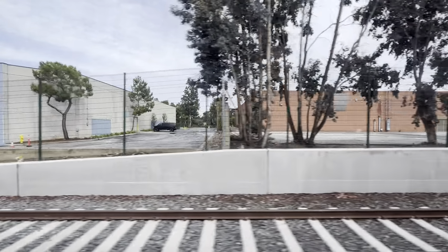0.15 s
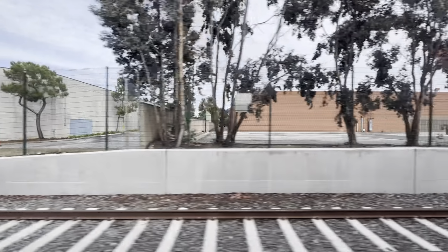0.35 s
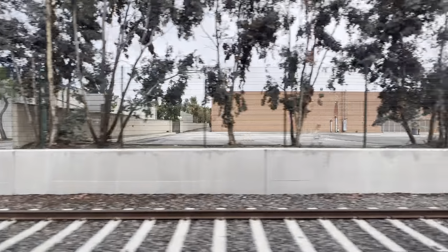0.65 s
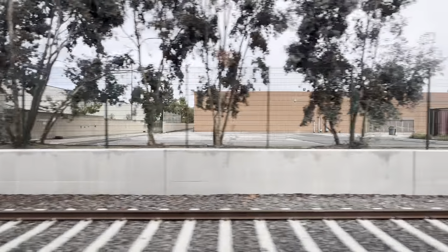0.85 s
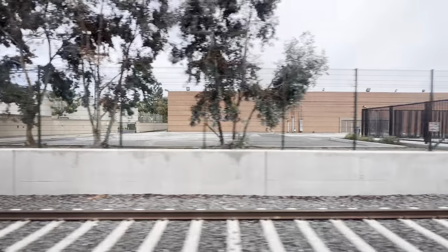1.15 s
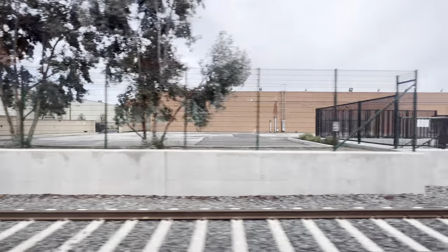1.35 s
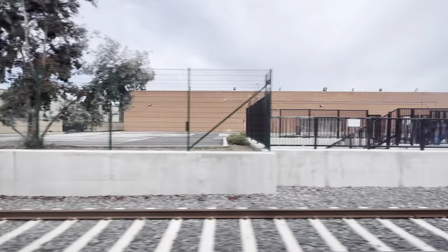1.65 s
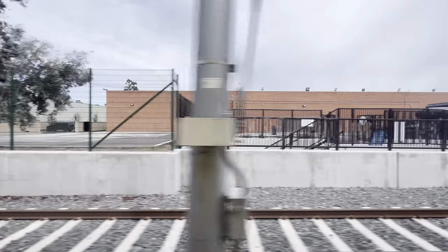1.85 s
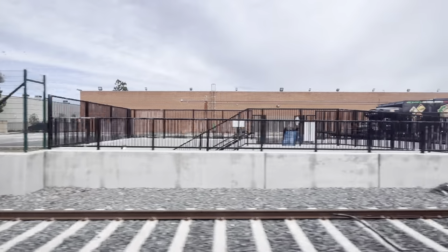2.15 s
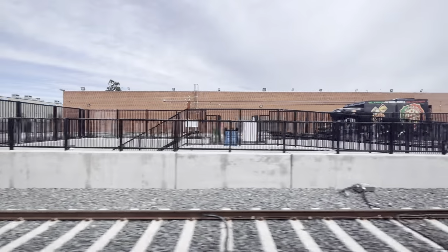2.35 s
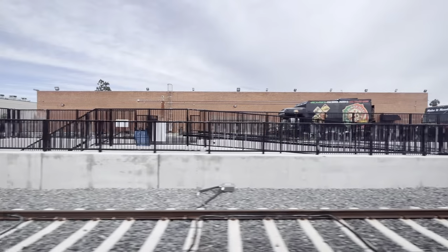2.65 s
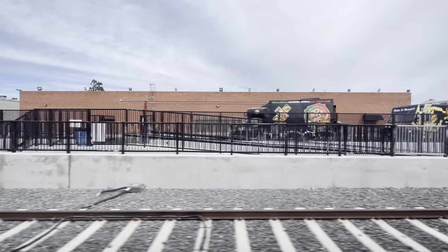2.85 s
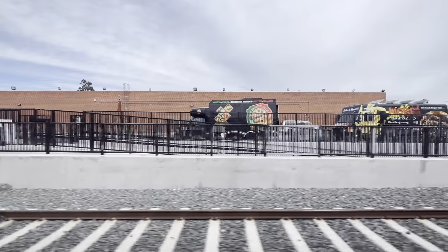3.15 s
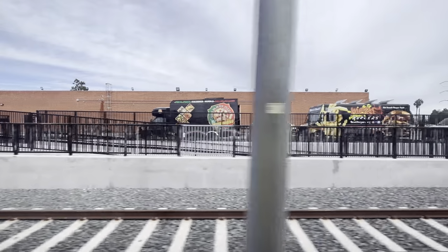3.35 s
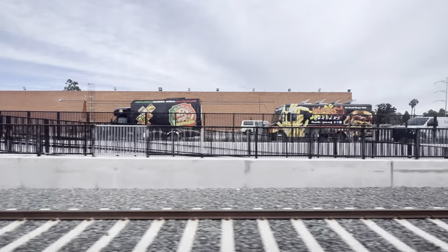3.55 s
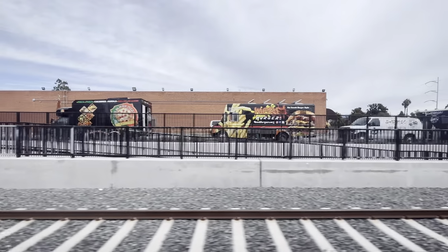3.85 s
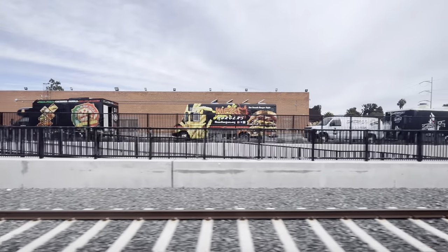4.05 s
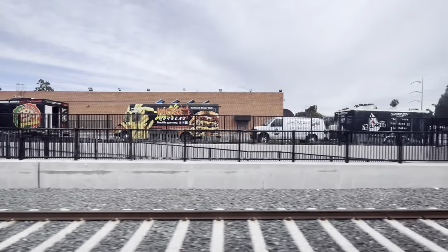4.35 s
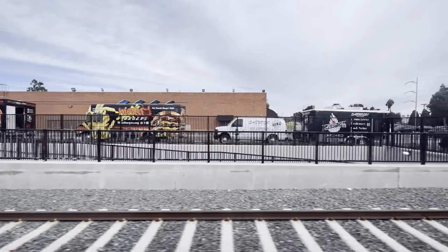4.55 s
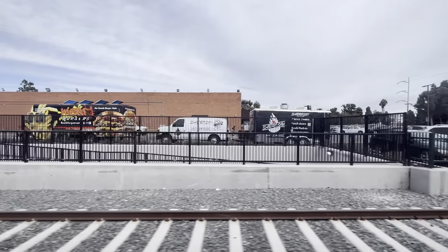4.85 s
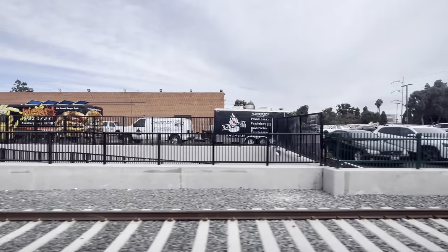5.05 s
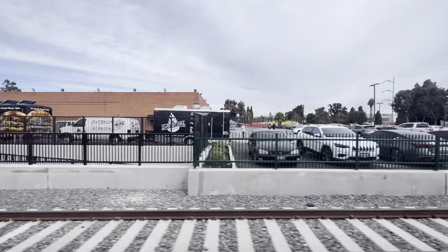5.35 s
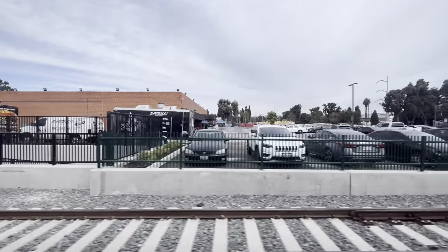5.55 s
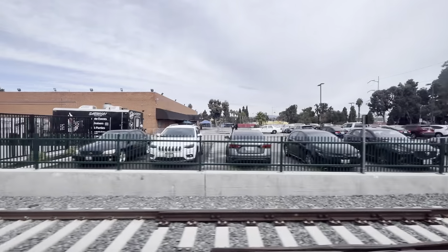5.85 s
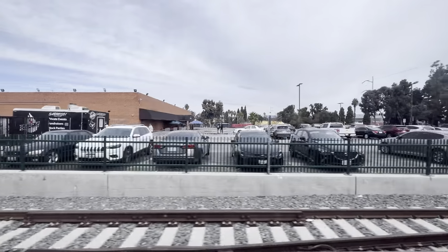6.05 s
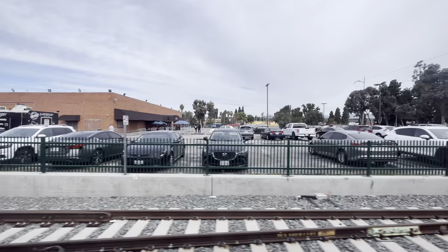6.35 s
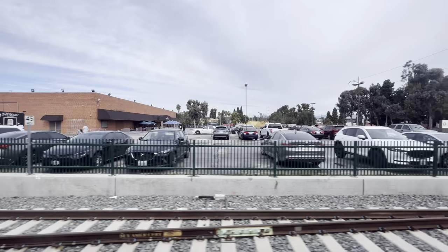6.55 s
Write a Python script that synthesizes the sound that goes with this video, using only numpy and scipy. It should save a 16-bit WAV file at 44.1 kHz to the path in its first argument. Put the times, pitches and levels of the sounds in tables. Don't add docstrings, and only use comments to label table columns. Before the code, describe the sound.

Low train rumble surges and eases beneath heavy joint thuds, dull floor knocks, faint rail pings and tiny ticks of loose trim.

```python
import sys
import numpy as np
from scipy import signal
from scipy.fft import rfft, irfft
from scipy.io import wavfile
from scipy.ndimage import uniform_filter1d

SR = 44100
rng = np.random.default_rng(int(sys.argv[2]) if len(sys.argv) > 2 else 0)


def bounce(signal):
    frames = np.transpose(np.atleast_2d(signal))
    limited = np.clip(frames, -1, 1)
    pcm = np.round(limited * 32767).astype(np.int16)
    wavfile.write(sys.argv[1], SR, pcm)


def voltage_ratio(level):
    return 10 ** (np.asarray(level, float) / 20)


N = 295470
TIME = np.arange(N) / SR
COARSE = TIME[::64]
FREQ = np.maximum(np.arange(N // 2 + 1) * SR / N, 1)

# (frequency [Hz], width [Hz], level [dB])
BOGIE_MODES = [(40, 39, -1.5), (56.2, 9.9, 2.5), (67.5, 20, 3.5)]
PANEL_MODES = [(131.3, 23.4, 2), (166.7, 28.3, -2)]
WHEEL_MODES = [(275, 30, -1), (311.3, 30, -1.5), (359.7, 29, -5.5), (403.6, 37, -4), (457, 52, -11)]
RAIL_MODES = [(601, 190, -2), (687, 75, -2), (765.4, 80, -1), (967, 160, -2), (1235, 170, -8),
              (1760, 790, -11)]
# (time [s], long waves [dB], short corrugation [dB])
TRACK = [(0.0, -8, -5), (0.25, 4, 1), (0.55, 0, 3.5), (1.0, 0.5, 3.5), (1.5, -2, 0.5), (1.95, -3, -0.5),
         (2.3, -2, 0), (2.65, -16.5, 2), (3.05, -4.5, 1.5), (3.55, 6.5, -4), (3.9, 0, -12), (4.3, 3, 1),
         (4.65, 2.5, 2), (5.05, 3.5, -9.5), (5.4, 4.5, -5.5), (5.75, 2, -5.5), (6.05, -6.5, -10),
         (6.7, -12.5, -11)]
# (peak time [s], time to fall 10 dB [s], peak level [dB])
LURCHES = [(0.21, 0.15, -17.5), (0.361, 0.06, -15), (0.7, -0.56, -18.5), (0.94, 0.15, -15),
           (1.2, 2.8, -29.5), (1.33, 0.7, -28.5), (1.57, 0, -19), (1.86, -0.6, -19), (2.12, 0.3, -27.5),
           (2.23, 0.46, -28), (2.41, -1, -23.5), (2.5, 0.44, -28), (2.7, -0.1, -24.5), (2.89, 0, -22),
           (3.71, -0.2, -24.5), (3.93, 0.8, -26), (4.11, 0.02, -16), (4.51, -0.5, -29.5),
           (4.7, 0.25, -19.5), (4.93, -0.28, -18), (5.09, -0.4, -25.5), (5.37, 0.16, -17),
           (5.611, .15, -24), (5.8, 0.2, -28), (6.11, -1.5, -27), (6.24, 2.7, -32.5)]
# (peak time [s], time to fall 10 dB [s], peak level [dB], pitch [Hz])
BOOMS = [(0.08, 0.25, -21, 110), (0.35, -0.26, -5, 102.6), (0.478, -0.07, -13, 99.3),
         (0.58, 0.06, -23.5, 100), (0.819, 0.04, -18.5, 110.5), (0.282, 0.14, -13, 110),
         (1.25, 0.03, -16.5, 94.7), (1.47, 0.22, -24, 97.7), (1.72, 0.23, -22.5, 99),
         (2.43, 0.29, -20.5, 98), (2.7, 0.15, -17, 98), (3.4, 0, -21, 94.3), (3.53, 0.1, -23.5, 97),
         (3.77, 0.2, -19.5, 98), (4.0, -0.03, -20, 109.9), (4.38, 0.27, -25, 98), (4.54, 0.16, -18.5, 98),
         (4.682, -0.39, -22.5, 116), (5.47, 0.03, -19, 98), (5.71, 0.08, -20, 95),
         (5.92, -0.12, -18.5, 94.9), (6.31, 1.1, -31, 98)]
# (peak time [s], time to fall 10 dB [s], peak level [dB], brightness [dB])
JOLTS = [(0.01, -0.06, -23, 2), (0.07, 0.5, -26.5, 8.5), (0.161, 0.3, -19.5, -1.5), (0.329, 0, -16, 1),
         (0.25, 0.03, -22, 4), (0.64, -0.06, -21, 7), (0.771, 0.23, -17, 4.5), (1.0, 0.1, -24.5, -3),
         (1.21, -1.5, -31, 13), (1.309, .04, -22, -2.5), (1.414, -0.13, -17, 2), (1.47, 0.42, -25, -3.5),
         (1.55, 0.4, -40, -2), (1.73, -1.14, -25.5, 6), (2.14, -0.5, -31, 2), (2.268, 0.15, -23, 12),
         (2.548, 0.08, -24, 2.5), (2.719, 1.5, -27, 1.5), (0.85, 0.67, -26, 0.5),
         (3.731, 0.07, -25.5, -2.5), (3.961, 0.14, -22, -0.5), (4.09, 0.35, -19.5, -1),
         (4.16, -0.04, -25, -7), (4.599, 0.19, -17.5, 1.5), (4.75, 0.3, -21, 3), (4.91, 0.28, -24, 4),
         (5.3, 0, -29, 3.5), (5.43, 0.17, -23.5, 0.5), (5.53, -0.09, -25.5, -6), (6.15, 1, -36.5, -1)]
# (time [s], length [s], wheel level [dB], rail level [dB])
ROARS = [
    (0.13, 0.27, -29, -36.5),
    (0.618, 0.32, -24.5, -25),
    (1.194, 0.04, -39, -30.5),
    (1.75, 0.46, -35, -31),
    (2.526, 0.029, -41, -29),
    (3.276, 0.24, -33, -43),
    (3.95, 0.21, -29.5, -42),
    (4.57, 0.36, -31, -34.5),
    (5.42, 0.09, -33, -38),
]
# (time [s], peak level [dB],
# ring [Hz])
THUDS = [(0.221, -12.5, 128), (0.431, -15, 122.5), (0.629, 1, 163), (0.79, -2.5, 157), (0.976, -3, 174),
         (1.214, -11, 171), (1.405, -2.5, 146), (1.613, -16.5, 163), (2.189, -10, 158), (2.807, -17, 132),
         (3.572, -11, 130), (3.724, -18, 135), (3.887, -4.5, 211), (3.948, -10, 215), (4.009, -25, 139),
         (4.075, -24, 176), (4.184, -14.5, 129), (4.311, -9, 226), (4.637, -6.5, 206), (4.753, -3, 157),
         (5.081, -20, 177), (5.415, -26, 133), (1.6, -24, 214), (4.21, -12, 215), (4.358, -3.5, 215),
         (4.49, -13, 204), (4.831, -11, 197), (5.29, -13, 224), (5.42, -6.5, 219), (2.959, -14.5, 150)]
# (time [s], peak level [dB], ring [Hz])
AXLE_KNOCKS = [(0.186, -17, 74), (0.341, -8, 76.6), (0.676, -15, 69.6), (0.914, -13, 51),
               (0.983, -16, 56.5), (1.109, -19, 76.4), (1.281, -22, 71.5), (1.454, -20, 61.9),
               (1.963, -23, 71), (2.11, -18, 64.6), (2.21, -17, 51.5), (2.384, -20, 75.4),
               (2.479, -18.5, 72.4), (2.87, -21.5, 65.7), (3.089, -22, 61), (3.45, -19, 64.6),
               (3.686, -19, 61.9), (3.905, -18, 55.7), (4.08, -12, 76.6), (4.679, -17.5, 74),
               (4.783, -20, 63), (4.907, -12, 53.8), (5.056, -18, 75), (5.349, -18.5, 61.9),
               (5.573, -23, 70.5)]
FLOOR_KNOCKS = [(0.021, -12, 110), (0.06, -9.5, 103.6), (0.129, -5, 106.5), (0.177, -7, 96.4),
                (0.222, -12, 110.3), (0.427, -7.5, 91.6), (0.626, -8.5, 109.4), (0.744, -2, 141),
                (0.971, -17, 160), (1.297, -15.5, 166.5), (1.402, -6, 147), (1.46, -14.5, 123),
                (1.568, -6, 109.7), (1.805, -20.5, 86.1), (1.86, -16, 92), (1.92, -16.5, 123),
                (1.985, -18.5, 113), (2.186, -10, 102), (2.327, -16, 102.5), (2.641, -14.5, 105.4),
                (2.978, -15, 136.6), (3.156, -11, 107), (3.251, -13.5, 118), (3.285, -9.5, 100),
                (3.356, -17, 106), (3.589, -14, 99), (3.721, -15.5, 146), (3.883, -14, 202.6),
                (3.94, -10.5, 100), (4.086, -10.5, 103), (4.184, -7, 110), (4.268, -9, 96),
                (4.457, -7.5, 104.4), (4.577, -5, 112.4), (4.635, -5, 168), (4.822, -13, 107),
                (5.03, -13, 112), (5.419, -16, 217), (5.518, -13.5, 116), (5.597, -16, 128),
                (5.658, -16.5, 101.4), (5.841, -12.5, 101.6), (6.013, -26, 119.4), (6.253, -19, 98),
                (6.401, -24, 110), (6.526, -21, 99)]
WHEEL_KNOCKS = [(0.037, -16.5, 323), (0.127, -21, 407), (0.184, -17, 295), (0.234, -12, 260),
                (0.303, -19, 257), (0.385, -24, 285), (0.58, -28.5, 344), (0.64, -17, 406),
                (0.769, -13, 298.4), (0.978, -24.5, 337), (1.076, -26, 260), (1.283, -24, 283),
                (1.339, -18, 338), (1.439, -26, 256), (1.502, -20, 306), (1.641, -27, 392),
                (1.694, -23, 313), (1.802, -24, 380), (1.901, -26, 335), (1.995, -27, 364),
                (2.063, -20, 354), (2.343, -21.5, 300), (2.545, -14, 270), (3.19, -19, 297),
                (3.244, -24, 258), (3.355, -25, 356), (3.433, -26, 363), (3.686, -26, 360),
                (3.966, -17, 271), (4.122, -20, 259), (4.334, -20.5, 405), (4.452, -24, 253),
                (4.585, -21.5, 357), (4.719, -15, 381), (4.852, -17, 265), (5.404, -23, 253),
                (5.49, -22.5, 328), (5.6, -28, 337), (6.573, -27.5, 359), (6.655, -25.5, 261)]
RAIL_PINGS = [(0.158, -22, 746), (0.481, -27.5, 895), (0.549, -22, 820), (0.656, -21, 713), (0.7, -18, 672),
              (0.743, -31, 680), (0.83, -17, 782), (0.9, -28, 723), (0.98, -21, 703), (1.256, -28, 685),
              (1.362, -21.5, 744), (1.418, -23, 920), (1.739, -30, 736), (1.807, -20, 876),
              (1.911, -15, 770), (1.968, -25, 807), (2.041, -23, 730), (2.081, -21, 746), (2.13, -20, 818),
              (2.429, -31, 797), (2.532, -22.5, 698), (2.811, -20, 966), (3.465, -22, 804),
              (3.507, -23, 694), (4.158, -21, 719), (4.521, -26, 945), (4.589, -16.5, 686.3),
              (4.701, -27, 680), (4.748, -20, 858), (4.88, -22, 725), (4.92, -24, 717), (5.04, -24, 682.6),
              (6.032, -25, 762.7), (6.163, -26, 978), (6.238, -31, 1040), (6.32, -21, 989)]
PANE_KNOCKS = [(0.886, -18, 261.7), (1.612, -19, 226), (2.529, -17, 175.7), (2.681, -19, 234),
               (2.806, -23, 227.6), (3.184, -25, 205), (3.479, -16, 269), (4.479, -14, 205),
               (4.739, -13, 175), (4.869, -18.5, 258.5), (4.929, -19, 195), (5.289, -17.5, 199),
               (6.346, -18.5, 217.6)]
# (time [s], peak level [dB], frame over strip [dB])
TICKS = [(0.2224, -54.5, 21), (0.2974, -61, 18), (0.3544, -59, 12), (0.9233, -57, 20), (1.0096, -55, 9),
         (1.0765, -52, 9), (1.1149, -57, 19), (1.3044, -55, 20), (2.3535, -57, 8), (2.4907, -53, 10),
         (3.0061, -53, 8), (4.0549, -55.5, 9), (4.1046, -54, 16), (4.1599, -52.5, 14), (4.2462, -56, 13.5),
         (4.4681, -53, 13), (4.6423, -55, 16), (4.7022, -58, 19), (4.7351, -52.5, 14.5), (4.8314, -52, 7),
         (4.8863, -55, 6), (5.0245, -55, 7), (5.0983, -52, 11), (5.2604, -54, 5), (5.3527, -54, 15),
         (5.4999, -53, 13), (5.6605, -54.5, 17), (5.7134, -53, 6), (6.1055, -54, 11), (6.4153, -57, 11)]
# (frequency [Hz], width [Hz], left level [dB], right level [dB])
STRIP_MODES = [(6180, 150, 13, -5.5), (6900, 40, 15, 13.5), (7270, 53, 5, 13), (8400, 120, 11, 4),
               (8450, 88, 12, 17), (9700, 150, -5, 9.5), (10250, 120, -6.5, 0.5), (10570, 160, 1, 6),
               (13700, 300, -19, -11)]
FRAME_MODES = [(4740, 63, 26.5, 18.5)]
# (frequency [Hz], density [dB per Hz])
VENT_SPECTRUM = [(59, -29), (100, -0.5), (155, -16.5), (221, -7), (292, -10), (394, -7), (461, -9),
                 (574, -12.5), (981, -11.5), (1350, -14), (2050, -17.5), (2810, -27.5), (4900, -35),
                 (8890, -54), (11500, -68), (15000, -74), (22000, -120)]
# (frequency [Hz], width [Hz], level [dB])
DUCT_MODES = [(950, 160, -54), (1960, 180, -49), (4900, 210, -51.5), (8720, 370, -62.5)]
# (peak time [s], time to fall 10 dB [s], peak level [dB])
GUSTS = [
    (0.02, 1, -38.5),
    (0.22, 0.2, -43),
    (0.9, 1.3, -44.5),
    (2.5, 3, -48),
    (4.3, 7, -49),
    (4.739, 2, -51),
    (5.0, 7, -48.5),
]
# (frequency [Hz], left minus right [dB])
PORT_SHADING = [(60, -3), (200, 0), (600, 0), (1100, 3.5), (2000, 4), (3000, 0.5), (4800, 7), (6000, 9.5),
                (7500, -1), (9000, -6), (10200, -17), (10900, -4), (11500, 4)]
# (frequency [Hz], likeness [-1..1])
PORT_LIKENESS = [(60, 0.96), (130, 0.94), (210, 0.57), (300, -0.28), (430, -0.12), (600, -0.45),
                 (820, -0.18), (1100, -0.26), (1500, -0.47), (1900, 0.22), (3000, 0.044), (12000, -0.31)]

BOGIE_DB, BOOM_DB, PANEL_DB, PANE_DB = -34.5, -29.5, -33.5, -35
WHEEL_DB, RAIL_DB, DRAUGHT_DB = -39.5, -31.5, -51.5
BOOM_HZ, PANE_HZ = 98, 212.9
# (offset [dB], share of the brightness)
JOLT_PANEL, JOLT_PANE = (0.25, -0.85), (-1.65, 0.058)
JOLT_WHEEL, JOLT_RAIL = (-11, 0.76), (-13.5, 0.71)
SWELL_RISE_SHARE, JOLT_RISE_SHARE = 0.693, 0.26


def running_gear():
    waves_db, boom_power = track(column=1), swells(BOOMS)
    total_boom = boom_power.sum(axis=0)
    steady = voltage_ratio(BOOM_DB + waves_db) ** 2
    boom_hz = fine((steady * BOOM_HZ + np.array(BOOMS)[:, 3] @ boom_power) / (steady + total_boom))
    bogie = even(ring(noise(), BOGIE_MODES, order=2), 0.066, 0.84) * shaken(BOGIE_DB + waves_db, LURCHES)
    tone = even(waver(boom_hz, 0.0593), 0.077, 0.95) * shaken(BOOM_DB - 16 + waves_db, BOOMS)
    rumble = even(ring(noise(), [(96.7, 38.5, 0)], order=2), 0.039, 1.0)
    rumble = rumble * fine(np.sqrt(steady * voltage_ratio(-4.5) + 0.015 * total_boom))
    panels = even(ring(noise(), PANEL_MODES, order=2), 0.093, 0.93)
    panels = panels * jolted(PANEL_DB + 0.73 * waves_db, *JOLT_PANEL)
    return bogie + tone + rumble + panels


def rolling():
    waves_db, ripple_db = track(column=1), track(column=2)
    wheel_roar, rail_roar = roaring(column=2), roaring(column=3)

    pane = waver(PANE_HZ, 0.0699) * voltage_ratio(-4.0)
    pane = pane + even(ring(noise(), [(215, 98, 0)], order=2), 0.041, 1.0) * voltage_ratio(-2.0)
    pane = even(pane, 0.14, 0.41) * jolted(PANE_DB + 0.65 * waves_db, *JOLT_PANE)

    wheel_gain = np.hypot(jolted(WHEEL_DB + 0.34 * ripple_db, *JOLT_WHEEL), fine(np.sqrt(wheel_roar)))
    wheel = even(flicker(WHEEL_MODES, 1.5, 6.1), 0.08, 0.78) * wheel_gain
    rail_gain = np.hypot(jolted(RAIL_DB + ripple_db, *JOLT_RAIL), fine(np.sqrt(rail_roar)))
    rail = even(flicker(RAIL_MODES, 3.1, 11), 0.3, 0.46) * rail_gain

    top = level(ring(noise(), [(1350, 430, 0)], order=2), -34.5)
    top = top * fine((rail_roar / rail_roar.max()) ** (3 / 2))
    return pane + wheel + rail + top


def thuds():
    clank = level(ring(noise(), [(716, 600, -4.5), (1263, 130, 1)], order=2), 0)
    clank = clank * bursts(THUDS, -24.5, 0.0025, 0.23)
    return knocks(THUDS, db=-4.5, rise_s=0.0025, t60_s=0.13, second=0.65) + clank


def blows():
    axle = knocks(AXLE_KNOCKS, db=0.5, rise_s=0.012, t60_s=0.23, second=0.9)
    floor = knocks(FLOOR_KNOCKS, db=-1.0, rise_s=0.0068, t60_s=0.31, second=1.0)
    pane = knocks(PANE_KNOCKS, db=-0.5, rise_s=0.012, t60_s=0.34, second=0.92)
    wheel = knocks(WHEEL_KNOCKS, db=0.5, rise_s=0.008, t60_s=0.27, second=0.93)
    rail = knocks(RAIL_PINGS, db=-3.0, rise_s=0.005, t60_s=0.27, second=0.98)
    return axle + floor + pane + wheel + rail


def trim():
    late_s = rng.random(len(JOLTS)) * 0.08
    chatter = [(jolt[0] + s, -38.5 + jolt[2], 17) for jolt, s in zip(JOLTS, late_s)]
    ticks = TICKS + chatter
    answers = [(s, peak + frame - 13.5) for s, peak, frame in ticks]
    strip = strike(ticks, STRIP_MODES, 7.9, 0.13)
    return strip + strike(answers, FRAME_MODES, 3, 0.081)


def ventilation():
    air = level(irfft(rfft(noise()) * voltage_ratio(along(VENT_SPECTRUM)), N), -29 + 2.5)
    air = air * voltage_ratio(0.5 * walk(8.2))
    ducts = 0
    for hz, width, db in DUCT_MODES:
        ducts = ducts + level(ring(noise(), [(hz, width, 0)]), db) * voltage_ratio(1.4 * walk(9))
    seal_modes = [(3250, 1080, 0.5), (5630, 2400, -5.0), (9400, 1900, -13.5)]
    draught = level(ring(noise(), seal_modes, order=2), 0)
    draught = draught * shaken(DRAUGHT_DB + 0 * COARSE, GUSTS) * voltage_ratio(-3.5)
    return air + ducts + draught


def knocks(events, db, rise_s, t60_s, second):
    out, age = np.zeros((2, N + SR)), TIME[:SR // 2]
    for s, peak, hz in events:
        phase, start = 2 * np.pi * hz * age, int(s * SR)
        envelope = voltage_ratio(peak + db - 60 * age / t60_s) * (1 - np.exp(-age / rise_s))
        out[:, start:start + len(age)] += envelope * np.array([np.sin(phase), np.cos(second * phase)])
    return out[:, :N]


def strike(events, modes, scratch_db, scratch_s):
    drive = taps(events) * voltage_ratio(30.5) + noise() * bursts(events, scratch_db, 0.0014, scratch_s)
    ports = []
    for side in range(2):
        ports.append(ring(drive[side], [(row[0], row[1], row[2 + side]) for row in modes]))
    return np.array(ports)


def taps(events):
    out = np.zeros(N)
    for s, peak in np.array(events)[:, :2]:
        out[int(s * SR)] = voltage_ratio(peak)
    return out


def bursts(events, db, rise_s, t60_s):
    age = TIME[:int(t60_s * SR)]
    shape = (1 - np.exp(-age / rise_s)) * voltage_ratio(db - 60 * age / t60_s)
    return signal.fftconvolve(taps(events), shape)[:N]


def jolted(steady_db, offset_db, share):
    felt = [(s, fall_s, db + offset_db + share * bright_db) for s, fall_s, db, bright_db in JOLTS]
    return shaken(steady_db, felt, JOLT_RISE_SHARE)


def shaken(steady_db, events, rise_share=SWELL_RISE_SHARE):
    return fine(np.sqrt(voltage_ratio(steady_db) ** 2 + swells(events, rise_share).sum(axis=0)))


def swells(events, rise_share=SWELL_RISE_SHARE):
    s, fall_s, peak_db = np.array(events).T[:3, :, None]
    age = COARSE - s
    drop_db = 10 * np.maximum(age, -age / rise_share) / np.maximum(fall_s, 0.01)
    return voltage_ratio(peak_db - drop_db) ** 2


def roaring(column):
    rise_s, fall_s = 0.009, 0.058
    s, hold_s, db = np.array(ROARS).T[[0, 1, column], :, None]
    age = COARSE - s
    outside = np.maximum(np.maximum(-age / rise_s, (age - hold_s) / fall_s), 0)
    return (voltage_ratio(db - 10 * outside) ** 2).sum(axis=0)


def track(column):
    return np.interp(COARSE, np.array(TRACK)[:, 0], np.array(TRACK)[:, column])


def waver(hz, spread):
    phase = 2 * np.pi * np.cumsum(hz * (1 + spread * walk(25))) / SR
    return np.sqrt(2) * np.array([np.sin(phase), np.cos(phase)]) * voltage_ratio(3.9 * walk(22))


def flicker(modes, db, rate):
    total = 0
    for mode in modes:
        total = total + ring(noise(), [mode], order=2) * voltage_ratio(db * walk(rate)) / np.sqrt(mode[1])
    return level(total, 0)


def ring(x, modes, order=1):
    gain = 0
    for k, (hz, width, db) in enumerate(modes):
        detuning = (FREQ ** 2 - hz ** 2) / (FREQ * width)
        gain = gain + (-1) ** k * voltage_ratio(db) / (1 + 1j * detuning) ** order
    return irfft(rfft(x) * gain, N)


def even(x, span_s, share):
    k = int(span_s * SR)
    power = uniform_filter1d(uniform_filter1d(x ** 2, k), k)
    return level(x / (power + 1e-12) ** (share / 2), 0)


def walk(rate):
    k = int(SR / rate)
    held = np.repeat(rng.standard_normal(N // k + 1), k)
    return 1.323 * uniform_filter1d(uniform_filter1d(held, k), k)[:N]


def noise():
    return rng.standard_normal((2, N))


def level(x, db):
    return x * voltage_ratio(db) / np.sqrt(np.mean(x ** 2))


def along(table):
    hz, value = np.array(table).T
    return np.interp(np.log(FREQ), np.log(hz), value)


def fine(x):
    return np.interp(TIME, COARSE, x)


def scene():
    first, second = rfft(running_gear() + rolling() + thuds() + blows() + ventilation())
    like = np.clip(along(PORT_LIKENESS), -0.99, 0.99)
    tilt = voltage_ratio(along(PORT_SHADING) / 2)
    mid, side = first * np.sqrt((1 + like) / 2), second * np.sqrt((1 - like) / 2)
    norm = np.sqrt(2 / (tilt ** 2 + tilt ** -2))
    ports = np.array([(mid + side) * tilt, (mid - side) / tilt]) * norm
    return irfft(ports, N) + trim()


def roll_off(x):
    return signal.sosfilt(signal.butter(12, 15150, fs=SR, output="sos"), x)


def record(dry):
    response_db = along([(15, -11.5), (35, -5.5), (50, 1.0), (10800, -0.5), (11300, -9.0), (12000, -12), (16000, -44)])
    heard = irfft(rfft(dry) * voltage_ratio(response_db), N)
    hiss = level(ring(noise()[0], [(13100, 900, 0.008), (14300, 900, 0.008)], order=2), -90)
    heard = heard + hiss * voltage_ratio(2.5 * walk(12))
    return roll_off(np.tanh(0.59 * heard) / 0.61)


dry = scene()
out = record(dry)
bounce(out)
```